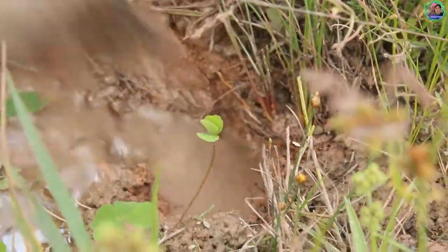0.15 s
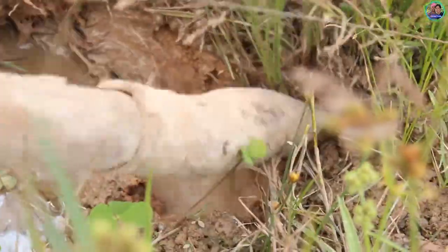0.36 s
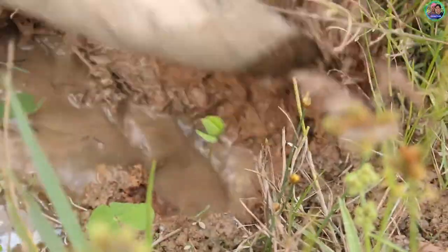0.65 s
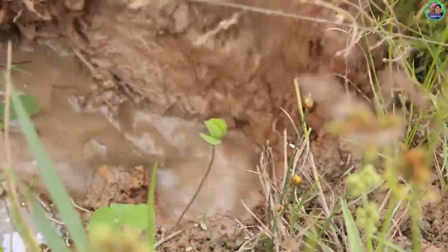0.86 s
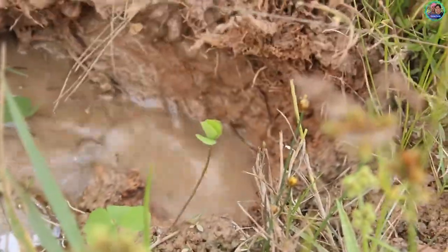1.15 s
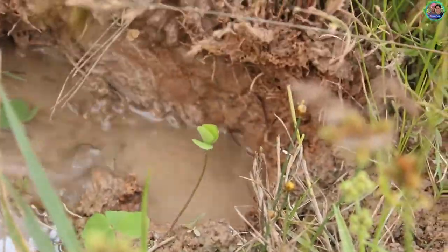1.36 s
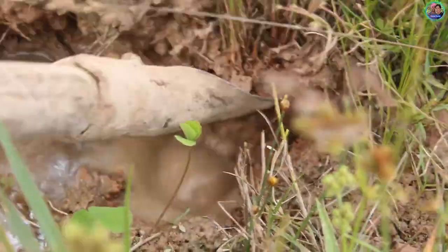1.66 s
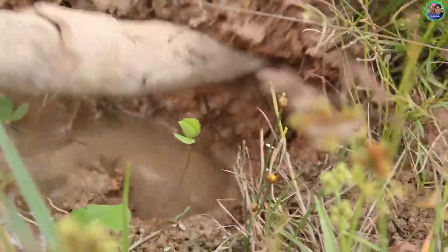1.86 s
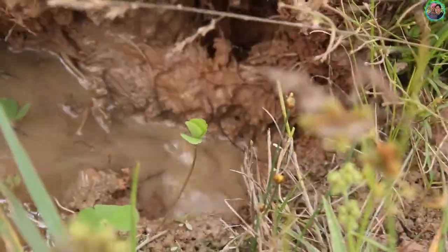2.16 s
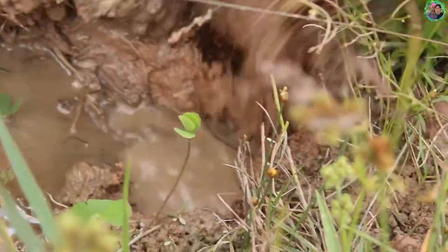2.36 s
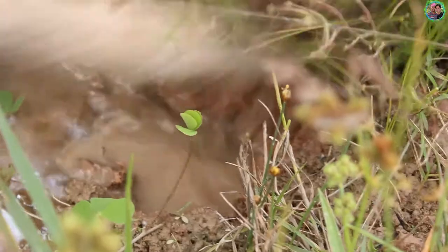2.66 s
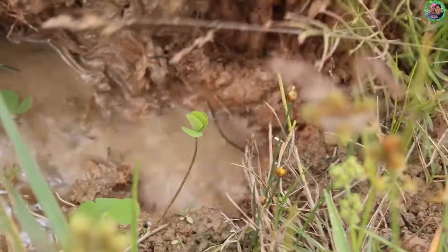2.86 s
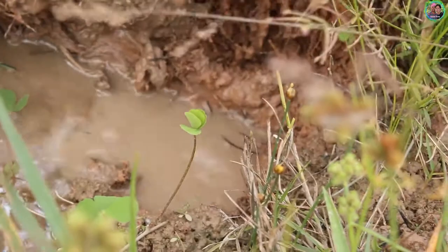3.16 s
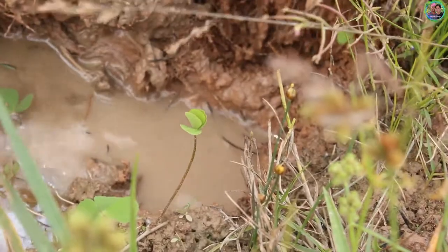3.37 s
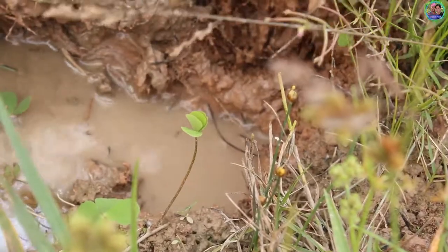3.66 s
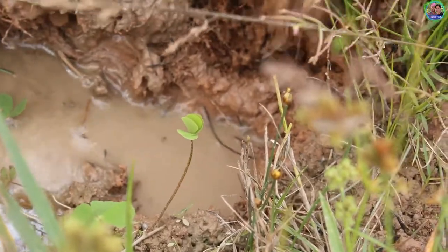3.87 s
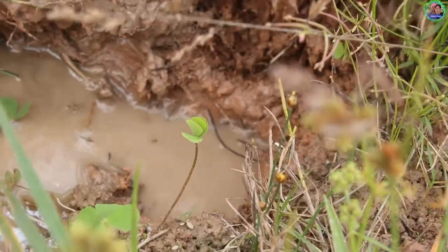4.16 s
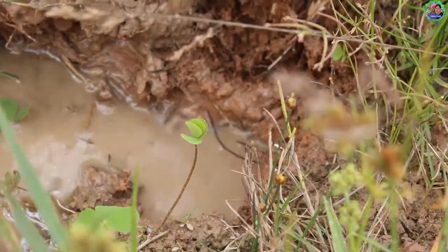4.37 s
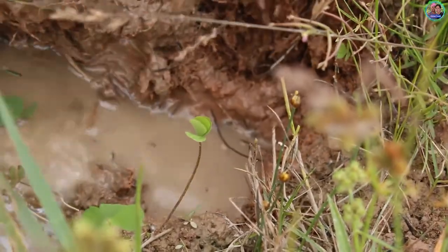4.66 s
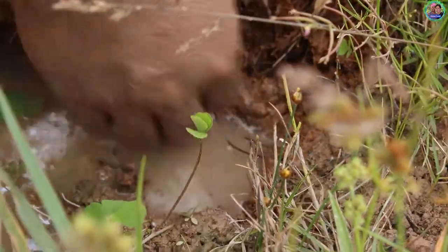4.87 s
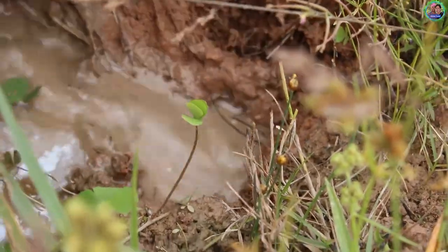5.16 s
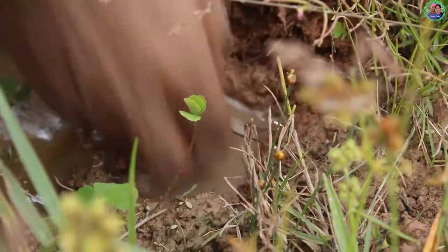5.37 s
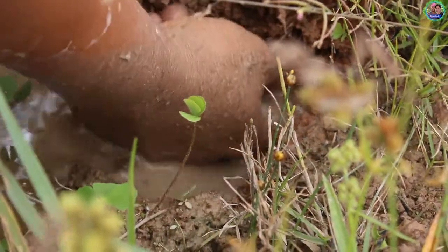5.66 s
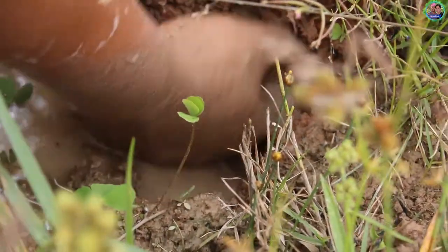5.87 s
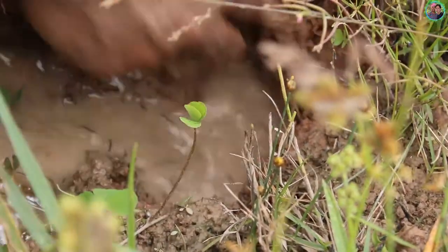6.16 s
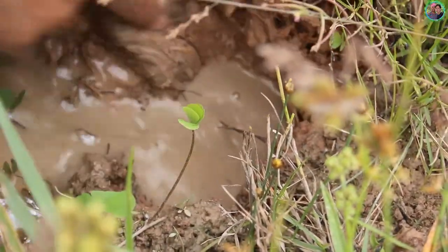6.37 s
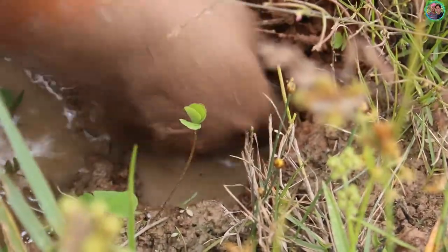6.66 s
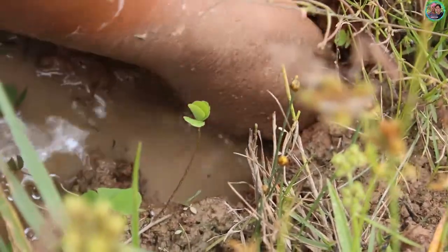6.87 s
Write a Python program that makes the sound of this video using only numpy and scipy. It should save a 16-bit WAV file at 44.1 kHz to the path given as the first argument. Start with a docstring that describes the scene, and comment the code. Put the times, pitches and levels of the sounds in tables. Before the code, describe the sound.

Close to a small mono microphone outdoors, a tool bites into wet soil with gritty crunches, snaps and brief slosh. Around the middle the mud turns wetter, with crowded plops, gurgles and squelches. Afterwards bare hands stir more quietly, with sparse drops, one hollow watery swish and soft drips. A far motor hums low and wavering beneath light wind and faint field hiss.

```python
"""Wet soil being dug at the bank of a muddy puddle, by a tool and then bare hands, close to a small mono
microphone. Near it: grit and slosh are filtered noise driven by strokes, roots and drops tick as short
snaps, air pockets plop as dying sines, closing cavities sweep upward and a cupped hand drags water.
Far off: a motor hums in two wavering orders, light wind rumbles as low noise over a steady field hiss,
and an insect trills now and then in trains of high pulses."""
import sys
import numpy as np
from scipy import signal
from scipy.fft import rfft, irfft
from scipy.io import wavfile
from scipy.ndimage import uniform_filter1d

SR = 44100
rng = np.random.default_rng(int(sys.argv[2]) if len(sys.argv) > 2 else 0)


def put_to_file(sound):
    """Save the sound as 16-bit audio at rate SR, in the file named by the first command-line argument."""
    columns = np.atleast_2d(sound).T  # one column per channel
    safe = np.clip(columns, -1, 1)
    whole_steps = np.round(safe * 32767)
    wavfile.write(sys.argv[1], SR, whole_steps.astype(np.int16))


N = 308960  # samples, about 7 s


def amp(db):
    """Decibels to gain."""
    return 10 ** (np.asarray(db) / 20)


def evened(x):
    """Scales to rms 1."""
    return x / np.sqrt(np.mean(x ** 2) + 1e-20)


def curves(rows):
    """Each column of a table after the time column, interpolated at every sample."""
    s, *columns = np.transpose(rows)
    return [np.interp(np.arange(N) / SR, s, c) for c in columns]


def coloured(x, points):
    """Filters x by a spectrum given on a log-frequency axis; rms 1."""
    f, db = np.transpose(points)
    hz = np.fft.rfftfreq(len(x), 1 / SR)
    gain = amp(np.interp(np.log(hz + 1), np.log(f + 1), db))
    return evened(irfft(rfft(x) * gain, len(x)))


def wander(per_s):
    """Slow random curve of rms 1: noise smoothed twice over 1 / per_s seconds."""
    width = int(SR / per_s)
    once = uniform_filter1d(rng.standard_normal(N), width)
    return evened(uniform_filter1d(once, width))


def add(mix, s, sound):
    """Mixes a sound in at time s."""
    part = mix[max(round(s * SR), 0):][:len(sound)]
    part += sound[:len(part)]


def crumbs(per_s, spread_db, smooth):
    """Clicks of very uneven size over a smooth bed of hiss."""
    struck = rng.exponential(1, N)
    size = amp(spread_db * np.minimum(struck, 5)) * (rng.random(N) < per_s / SR)
    burst = np.exp(-np.arange(60) / 10.7)  # each crumb breaks in a fraction of a millisecond
    clicks = evened(signal.oaconvolve(size, burst)[:N])
    return rng.standard_normal(N) * (smooth + clicks)


def patchy(x, depth_db):
    """Random patches in time and pitch: no two handfuls of soil sound alike."""
    z = signal.stft(x, nperseg=512, noverlap=384)[2]
    across_pitch = uniform_filter1d(rng.standard_normal(z.shape), 7, 0)
    field = evened(uniform_filter1d(across_pitch, 24, 1))
    return evened(signal.istft(z * amp(depth_db * field), nperseg=512, noverlap=384)[1][:len(x)])


# strokes through wet soil: (crest t/s, effort level/dB, rise t/s, fall t/s,
# shape 1 pointed - 3 blunt, weight of the low slosh against the grit level/dB before each layer's trim)
STROKES = [(0.021, -36, .1, 0.13, 0.86, -5.5), (0.33, -45, .06, 0.034, 1.2, -13),
           (0.36, -22, 0.018, 0.039, 2.4, -3), (0.48, -46, 0.017, 0.28, 2.5, -2.5),
           (0.655, -33.5, 0.16, 0.21, 1.36, -3.5), (0.86, -27, 0.077, 0.053, 1.86, -9),
           (0.948, -26.5, 0.044, 0.098, 1.03, -6), (1.086, -41, 0.33, 0.22, 0.78, -0.5),
           (1.27, -48.5, 0.23, 0.13, 1.3, -3.5), (1.387, -46.5, 0.13, 0.16, 0.8, -23),
           (1.591, -23.5, 0.015, 0.054, 2.16, 0.5), (1.81, -42.5, 0.088, 0.32, 1.4, 1),
           (2.04, -32, 0.14, 0.07, 1.25, 4), (2.11, -39, 0.056, 0.056, 4.3, 1),
           (2.341, -29, 0.083, .1, 1.22, -5.5), (2.739, -26, 0.038, 0.026, 1.9, -1.5),
           (2.86, -31.5, 0.18, 0.088, 1.5, -2.5), (2.999, -37, 0.25, 0.14, 1, -0.5),
           (3.275, -35.5, 0.14, 0.6, 0.86, -9), (3.394, -37.5, 0.14, 0.12, 1.13, 0),
           (3.507, -34, 0.067, 0.042, 0.83, 0), (3.6, -44, 0.5, 0.5, 1.3, 0.5),
           (3.767, -40.5, 0.11, 0.14, 0.78, -5), (3.85, -36, 0.078, 0.093, 1.25, -3),
           (4.005, -36, 0.21, 0.062, 1.03, -2.5), (4.13, -38.5, 0.034, 0.11, 2.6, -22),
           (4.214, -32.5, 0.13, 0.037, 1.28, -7), (4.404, -35.5, 0.1, 0.23, 0.79, 0),
           (4.545, -30, 0.011, 0.02, 1.4, 1), (4.7, -49, 0.58, 0.82, 2.3, 5.5),
           (4.97, -44, 0.45, 0.37, 1.9, -10), (5.145, -34, 0.27, 0.065, 1.3, -1.5),
           (5.22, -52.5, .1, 0.083, 1.6, -3), (5.274, -30, 0.024, 0.053, 0.92, -4.5),
           (5.9, -50, 0.063, 0.39, 1.2, -4), (6.12, -41, 0.091, 0.48, 1.96, -5),
           (6.455, -43.5, 0.13, 0.24, 1.3, -2.5), (6.56, -49, 0.18, 0.061, 3.6, 6),
           (6.818, -43, 0.011, 0.034, 0.84, -5)]
EDGE_DB = -20  # level of a stroke under its crest after its rise or fall time
SEEP_DB, SEEP_WEIGHT_DB = -57.5, -3.5  # mud that keeps seeping between strokes


def effort():
    """Strokes swell to a crest and die away; their powers add. Returns effort and slosh weight in dB."""
    t = np.arange(0, N + 32, 32) / SR
    s, db, rise, fall, shape, weight_db = np.transpose(STROKES)[:, :, None]
    before, after = (s - t) / np.maximum(rise, .004), (t - s) / np.maximum(fall, .004)
    away = np.where(t < s, before, after)
    power = amp(db + EDGE_DB * away ** np.clip(shape, .7, 4)) ** 2
    seep = amp(SEEP_DB) ** 2
    total = power.sum(0) + seep
    mean_db = ((power * weight_db).sum(0) + seep * SEEP_WEIGHT_DB) / total
    return [np.interp(np.arange(N) / SR, t, c) for c in (10 * np.log10(total), mean_db)]


# spectrum of wet grit: (f/Hz, relative level/dB)
GRIT = [(1060, -20), (1800, -5.5), (1990, -10), (2280, -6.5), (2840, -7), (3230, -0.5), (3710, -4),
        (4330, -3), (4920, -4), (5750, -2), (7840, -1.5), (8910, -8), (14600, -35.5), (15600, -54),
        (16000, -69)]
# spectrum of the mud under it: (f/Hz, relative level/dB)
SLOSH = [(150, -55), (250, -6), (352, -19), (534, 1), (801, -14), (1070, 2), (1680, -1), (3000, 2),
         (3900, -34), (6600, -120)]
# loose water splashing: (t/s, level/dB added to drops and small bubbles)
WET = [(0, -0.5), (1.7, -4.5), (2.1, 3.5), (2.3, -7.5), (3.3, -6), (3.9, 2.5), (4.4, 2), (5.9, 1),
       (6.1, -1), (7.01, 8)]


def dig():
    """Grit hisses and crackles over lower-sloshing mud; both stutter as the stroke sticks and slips."""
    effort_db, weight_db = effort()
    stutter_db = 1.01 * wander(103) - 0.066 * curves(WET)[0]  # loose water damps both slightly
    grit = patchy(coloured(crumbs(1500, 7.9, smooth=3.1), GRIT), 2.4) * amp(effort_db + stutter_db)
    slosh = patchy(coloured(crumbs(400, 4.6, smooth=3.0), SLOSH), 3.0)
    return grit + slosh * amp(effort_db + weight_db + stutter_db - 4.0)


def gurgle():
    """Many short drops and longer small bubbles, rising in pitch, where loose water is stirred."""
    effort_db, weight_db = effort()
    out = np.zeros(N)
    # cycles: how many pass while the ring falls to 1/e
    for hz, cycles in zip(np.geomspace(700, 8500, num=30), np.resize([.8, 1.6, 3.5], 30)):
        t = np.arange(round(5 * cycles * SR / hz)) / SR
        rising = np.sin(2 * np.pi * hz * t * (1 + 0.014 * hz * t))
        bubble = np.exp(-t * hz / cycles) * rising / np.sqrt(cycles)
        moments = rng.random(N) < 8 / SR  # about 8 per second at each pitch
        train = moments * amp(3 * np.minimum(rng.exponential(1, N), 3))
        out += signal.oaconvolve(train, bubble)[:N]
    return out * amp(effort_db + .4 * weight_db + curves(WET)[0])


# far motor, first order before its waver: (t/s, level/dB)
HUM = [(0, -47), (.35, -60), (.75, -39.5), (1.75, -52.5), (2.8, -44.5), (3.6, -49), (4.55, -47),
       (5.2, -56.5), (5.6, -45), (6.35, -45.5), (7.01, -57)]
HUM_HZ = 91.16  # mean pitch of the first order
# the second order swells and sinks in a slow beat: mean level, depth, beats per second, a fullest moment
THROB_DB, THROB_DEPTH, THROB_PER_S, FULL_S = -53, 0.52, 1.152, 2.833


def hum():
    """Two orders of a far motor whose speed drifts a little; both waver on the way through the air."""
    turns = np.cumsum(HUM_HZ * (1 + 0.00588 * wander(3.46))) / SR
    throb = 1 + THROB_DEPTH * np.cos(2 * np.pi * THROB_PER_S * (np.arange(N) / SR - FULL_S))
    levels = amp(curves(HUM)[0]), amp(THROB_DB) * throb
    out = np.zeros(N)
    for order, level in enumerate(levels, start=1):
        waver = amp(2.12 * wander(8.7))
        out += np.sqrt(2) * level * waver * np.sin(2 * np.pi * (order * turns + rng.random()))
    return out


# light wind before its lumps: (t/s, level/dB)
WIND = [(0.0, -52), (0.75, -42.5), (1.1, -44.5), (1.6, -46), (2.1, -52.5), (3.6, -49.5), (5.2, -54),
        (6.1, -44), (7.01, -46.5)]
# spectrum of the wind's rumble: (f/Hz, relative level/dB)
RUMBLE = [(8.8, -42), (15, 10), (32, 8), (70, 15), (89, 10.5), (183, 1.5), (261, -23.5), (400, -27),
          (520, -30), (880, -120)]
# spectrum of the far field: (f/Hz, relative level/dB)
AIR = [(47, -5.5), (80, 4.5), (217, -6.5), (323, -16.5), (563, -20.5), (2660, -27), (3960, -63),
       (7530, -24.5), (12300, -43.5), (14000, -49), (16000, -77)]
AIR_DB = -47.5  # centre of its slightly wandering level


def outdoors():
    """Lumpy low wind over the steady far hiss of the field, both coloured noise."""
    wind = coloured(rng.standard_normal(N), RUMBLE) * amp(curves(WIND)[0] + 2.4 * wander(6.6))
    return wind + amp(AIR_DB + 1.8 * wander(14)) * coloured(rng.standard_normal(N), AIR)


# spells of small pockets bursting at random: (start t/s, end t/s, mean level/dB)
BUBBLING = [(1.95, 2.14, -33), (3.76, 4.03, -32), (4.22, 4.28, -30), (4.33, 4.57, -29), (4.57, 4.7, -34),
            (4.78, 5.17, -37), (5.9, 6.4, -39)]
POCKETS_PER_S, LOW_HZ, HIGH_HZ = 75, 550, 3200  # at most 30 pockets in a spell


def small_pockets():
    """Rows like those of PLOPS, at random moments, sizes and pitches within each spell."""
    rows = []
    for start, end, db in BUBBLING:
        count = round((end - start) * POCKETS_PER_S)
        moment, size, pitch = rng.random((30, 3))[:count].T
        hz = LOW_HZ * (HIGH_HZ / LOW_HZ) ** pitch
        rows += zip(start + moment * (end - start), db + 12 * (size - .5), hz)
    return rows


# the loudest air pockets that burst in the mud: (t/s, nominal level/dB, nominal pitch f/Hz)
PLOPS = [(0.0391, -20, 2870), (0.743, -32.5, 597), (0.908, -27, 767), (1.8078, -23, 1106),
         (1.809, -28.5, 617), (1.818, -23.5, 1120), (1.859, -15.5, 2040), (2.0412, -17, 544),
         (2.041, -8, 2390), (2.0573, -16.5, 1220), (2.0715, -18.5, 2440), (2.123, -36, 700),
         (2.414, -29, 1190), (2.7405, -19.5, 3570), (2.7447, -15, 1040), (2.8533, -18, 3140),
         (3.1187, -25, 3130), (3.3885, -19.5, 2680), (3.549, -23, 2870), (3.579, -25, 2840),
         (3.773, -27.5, 1070), (3.7915, -21.5, 2170), (3.82, -24, 1100), (3.8431, -24.5, 1700),
         (3.8767, -16.5, 2100), (3.949, -22.5, 2430), (4.0056, -21, 1980), (4.1813, -22, 1560),
         (4.179, -17.5, 2380), (4.2182, -7, 2120), (4.2189, -6, 1294), (4.2312, -21, 1070),
         (4.325, -33, 970), (4.349, -23, 2440), (4.3796, -18, 3140), (4.4, -11, 2200), (4.4068, -19, 3860),
         (4.419, -21, 3500), (4.4264, -17, 3420), (4.4582, -18, 1770), (4.4653, -19, 1570),
         (4.473, -22, 3520), (4.5196, -17.5, 1570), (4.5347, -19, 1660), (4.5452, -20.5, 4080),
         (4.54, -50, 610), (4.6066, -26, 2180), (4.688, -26.5, 1724), (4.9925, -23.5, 2560),
         (5.033, -26.5, 700), (5.0385, -25, 1250), (5.09, -23, 2300), (5.092, -28.5, 516),
         (5.151, -22, 1110), (5.2716, -14, 3130), (5.273, -16.5, 1960), (5.274, -29, 1110),
         (5.295, -26, 2280), (5.305, -30, 2150), (5.33, -33.5, 1090), (5.9247, -27.5, 2070),
         (5.9996, -16.5, 2130), (6.351, -22.5, 2030), (6.5477, -21, 3280), (6.811, -14, 2830),
         (6.817, -29, 1870), (6.8286, -27, 940)]
RING_S, RING_SLOPE = .019, .45  # 60 dB decay time of a 1 kHz pocket; higher ones die sooner


def plops():
    """A bubble rings as a quickly dying sine that rises a little; the bursting skin adds a wider spit."""
    out, t = np.zeros(N), np.arange(3000) / SR
    rows = PLOPS + small_pockets()
    for (s, db, hz), noise in zip(rows, rng.standard_normal((len(rows), 3000))):
        life = t / (RING_S * (1000 / hz) ** RING_SLOPE)
        rising_hz = hz * 2 ** (0.3 * np.minimum(life, 1) - .04)
        ring = np.sin(2 * np.pi * np.cumsum(rising_hz) / SR)
        spit = coloured(noise, [(hz / 4, -30), (hz / 2.3, 0), (hz * 2.3, 0), (hz * 5, -30)])
        spit = .33 * spit * amp(-110 * life)
        onset = 1 - np.exp(-t / 0.00069)
        add(out, s, amp(db) * onset * (amp(-60 * life) * ring + spit))
    return out


# sharp cracks of grit, roots and drops:
# (t/s, nominal level/dB, centre f/Hz, low smack against that level/dB)
TICKS = [(0.348, -18, 7940, -20), (0.3573, -6, 4300, -8), (0.4647, -30, 5560, -25),
         (0.5831, -30, 3200, -24), (0.8323, -12, 5740, -7), (0.8603, -12.5, 7100, -26),
         (0.9389, -19, 7200, -11), (1.584, -9.5, 3130, -19), (1.8588, -25, 3230, -10), (2.04, -18, 4360, 6),
         (2.0737, -22.5, 4370, 2), (2.589, -36.5, 4740, -28), (2.7254, -21, 3300, -18),
         (2.797, -13, 3250, -24), (2.833, -21, 3180, -9), (2.9142, -29, 3300, -24), (3.1184, -26, 8350, -1),
         (3.3878, -19, 7000, -17), (3.5097, -21.5, 7280, -3), (3.7838, -20, 6600, -17),
         (3.8433, -20.5, 4340, -9), (3.8763, -14.5, 7280, -10), (4.118, -31, 7640, -13),
         (4.2171, -11.5, 3350, -1.5), (4.265, -26.5, 5250, -5), (4.4903, -19.5, 5500, -16),
         (4.544, -16.5, 3360, -23), (4.5775, -23.5, 5700, -12), (4.614, -23.5, 6600, -25),
         (4.6664, -24, 3000, -4.5), (4.9453, -26, 7500, -27), (4.9795, -20.5, 8200, -19),
         (5.0925, -26, 3220, -10), (5.137, -21, 6150, -5), (5.2706, -17, 4450, -20),
         (5.271, -9.5, 7200, -24), (5.297, -31, 8150, -20), (5.461, -31.5, 8100, -33),
         (5.534, -35.5, 7500, -26), (5.6133, -23, 6600, -39), (5.6855, -31, 7200, -33),
         (5.9715, -25.5, 6870, -11), (6.279, -25, 7000, -29), (6.7969, -33, 3270, -10),
         (6.8175, -24, 6750, -5)]


def ticks():
    """A snap of about a millisecond, noise and a short ring near its centre, and a lower wet smack."""
    out, t = np.zeros(N), np.arange(1500) / SR
    fade = amp(-60 * t / 0.0046) + 0.2 * amp(-60 * t / 0.026)  # snap and weaker tail
    fade = fade * (1 - np.exp(-t / .0001))
    for (s, db, hz, low_db), (a, b) in zip(TICKS, rng.standard_normal((len(TICKS), 2, 1500))):
        crack = coloured(coloured(a, GRIT), [(hz / 1.074, -9), (hz, 0), (hz * 2.1, -12)])
        ring = np.sin(2 * np.pi * hz * t)
        smack = amp(low_db) * coloured(b, SLOSH) * fade ** 0.9
        add(out, s, amp(db) * (fade * (0.6 * crack + 0.91 * ring) + smack))
    return out


# dull knocks through the ground: (t/s, nominal level/dB, f/Hz)
THUMPS = [(0.692, -18.5, 146), (0.785, -32.5, 200), (6.067, -28.5, 118), (6.378, -29, 100)]


def thumps():
    """One soft push of about a cycle: a sine under a bell-shaped swell."""
    out = np.zeros(N)
    for s, db, hz in THUMPS:
        u = np.arange(-2 / hz, 2 / hz, 1 / SR) * hz  # cycles from the middle
        push = np.exp(-(u / 0.34) ** 2) * np.sin(2 * np.pi * (u + 0.38))
        add(out, s - 2 / hz, amp(db) * push)
    return out


# insect trills: (t/s, length t/s, level/dB before the rasp)
TRILLS = [(2.48, 0.1, -51.5), (2.599, 0.056, -53), (3.16, 0.05, -52)]
TRILL_HZ, TRILL_PER_S = 8700, 101  # pitch, pulses per second


def insect():
    """Short trains of high, slightly raspy pulses."""
    out = np.zeros(N)
    for s, length, db in TRILLS:
        t = np.arange(round(length * SR)) / SR
        pulses = np.sin(np.pi * TRILL_PER_S * t) ** 2 * signal.windows.tukey(len(t), .4)
        add(out, s, amp(db) * pulses * np.sin(2 * np.pi * TRILL_HZ * t))
    return out * (1 + 0.75 * wander(900))


# cavities that close and sweep upward:
# (t/s, level/dB before the flutter, start f/Hz, end f/Hz, length t/s, fade level/dB)
SWEEPS = [(3.826, -33, 600, 1150, .012, 0), (3.972, -31, 740, 1300, .042, 13),
          (4.335, -37, 950, 1250, .06, 2), (4.36, -39, 2150, 2700, .03, 2),
          (4.404, -17, 1800, 1950, .03, 28), (4.418, -26, 1530, 1650, .025, 26),
          (4.472, -34, 900, 1300, .02, 4), (4.496, -34, 720, 860, .022, 8), (4.616, -38, 620, 700, .016, 6),
          (4.92, -44, 560, 900, .035, 4), (4.984, -43, 650, 1350, .045, 3),
          (5.192, -45, 700, 2800, .052, 0)]


def sweeps():
    """A shrinking pocket of air whistles upward, ever faster, and flutters."""
    out = np.zeros(N)
    for s, db, start_hz, end_hz, length, fade_db in SWEEPS:
        u = np.linspace(0, 1, round(length * SR))
        phase = 2 * np.pi * np.cumsum(start_hz + (end_hz - start_hz) * u ** 2) / SR
        add(out, s, amp(db - fade_db * u) * signal.windows.tukey(len(u), .2) * np.sin(phase))
    return out * amp(4 * wander(200))


# a cupped hand drags water: (t/s, level/dB before its flutter, hollow pitch f/Hz)
SWISH = [(6.1, -90, 1850), (6.235, -46.5, 1910), (6.3, -60, 1948), (6.36, -38.5, 2004), (6.41, -48, 2280),
         (6.46, -44, 2552), (6.59, -55, 2510), (6.63, -107, 2500)]


def swish():
    """Noise ringing in the hollow between palm and water."""
    level_db, hz = curves(SWISH)
    a, b = rng.standard_normal((2, N))
    band = uniform_filter1d(a, 50) + 1j * uniform_filter1d(b, 50)  # about 800 Hz wide
    carrier = np.exp(2j * np.pi * np.cumsum(hz) / SR)
    return amp(level_db + 3 * wander(40)) * evened((band * carrier).real)


def scene():
    """Close wet events get 20 ms of dying scatter from the walls of the hole; all else is added dry."""
    near = ticks() + plops() + gurgle()
    walls = rng.standard_normal(900) * amp(-60 * np.arange(900) / SR / 0.082)
    scatter = signal.oaconvolve(near, walls / np.linalg.norm(walls))[:N]
    near = near + amp(-11) * scatter
    mono = near + dig() + sweeps() + swish() + thumps() + hum() + outdoors() + insect()
    return np.array([mono, mono])


EDGE_HZ = 15700  # upper band limit


def record(dry):
    """A steep low-pass limits the band at the microphone."""
    lowpass = signal.firwin(511, EDGE_HZ, window=("kaiser", 9), fs=SR)
    return signal.oaconvolve(dry, lowpass[None], "same")


dry = scene()
out = record(dry)
put_to_file(out)
```